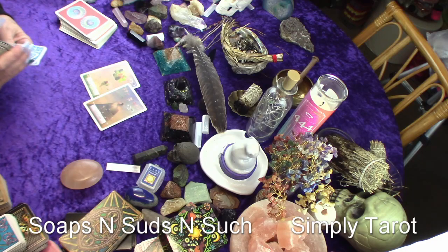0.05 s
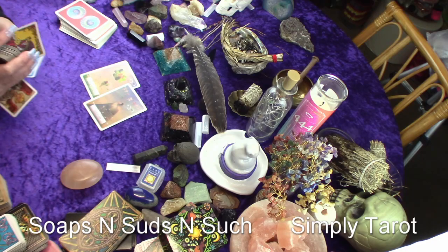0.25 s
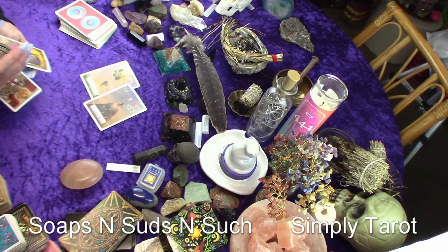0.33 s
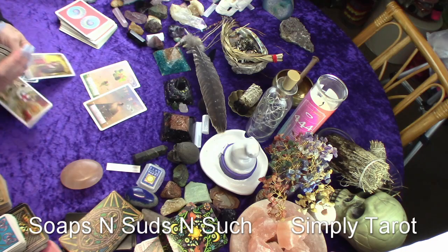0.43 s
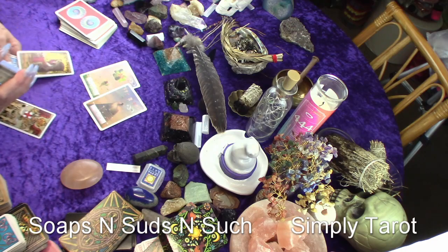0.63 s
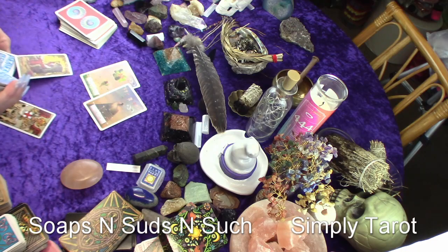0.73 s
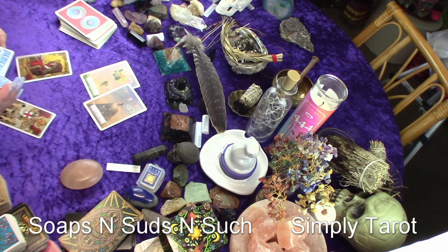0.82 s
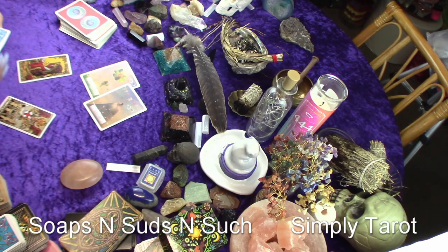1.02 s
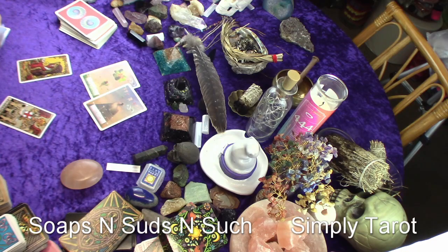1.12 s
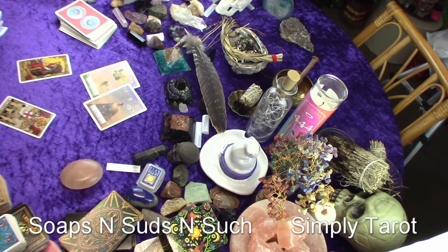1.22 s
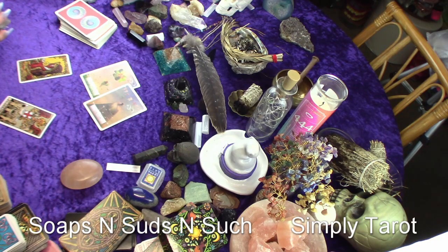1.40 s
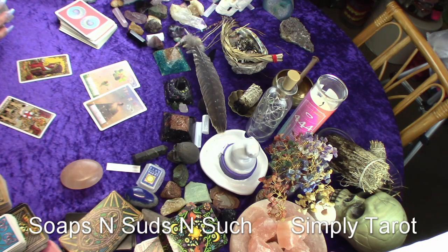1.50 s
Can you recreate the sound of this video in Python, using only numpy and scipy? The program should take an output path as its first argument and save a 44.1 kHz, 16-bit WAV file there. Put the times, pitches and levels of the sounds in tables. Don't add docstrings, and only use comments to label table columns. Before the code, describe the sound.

Crisp card snaps and one hard slap onto a cloth-covered table, then faint card rubbing indoors

```python
import sys
import numpy as np
from scipy import signal
from scipy.fft import rfft, irfft
from scipy.io import wavfile
from scipy.ndimage import uniform_filter1d

SR = 44100
rng = np.random.default_rng(int(sys.argv[2]) if len(sys.argv) > 2 else 0)


def put_to_file(sound):
    columns = np.atleast_2d(sound).T
    safe = np.clip(columns, -1, 1)
    whole_steps = np.round(safe * 32767)
    wavfile.write(sys.argv[1], SR, whole_steps.astype(np.int16))


def boost_factor(decibels):
    exponent = np.asarray(decibels, float) / 20
    return 10 ** exponent


N = 68355


def band(x, hz, width_hz):
    return signal.lfilter(*signal.iirpeak(min(hz, 0.45 * SR), hz / width_hz, fs=SR), x)


def unit(x):
    return x / np.sqrt(np.mean(x ** 2))


def walk(rate_hz):
    hold = int(SR / rate_hz)
    steps = np.repeat(rng.standard_normal(N // hold + 1), hold)
    smooth = uniform_filter1d(uniform_filter1d(steps, hold), hold)
    return unit(smooth[:N])


def hiss():
    # f/Hz, density level/dB
    spectrum = [(25, -42), (100, -11.5), (350, -3.5), (820, -7), (2500, -22.5), (9000, -31), (12500, -44),
                (15500, -58)]
    hiss_db, flicker_db = -59, 0.34
    hz, db = np.array(spectrum).T
    bin_hz = np.arange(N // 2 + 1) * SR / N
    colour = boost_factor(np.interp(np.log(bin_hz + 1), np.log(hz), db))
    noise = irfft(rfft(rng.standard_normal(N)) * colour, N)
    return unit(noise) * boost_factor(hiss_db + flicker_db * walk(33))


def thumps():
    # t/s, level/dB
    landings = [
        (0.328, -60),
        (0.518, -57.5),
        (0.749, -53),
        (.95, -60),
        (1.289, -65.5),
    ]
    hz, width_hz = 104, 47
    push = np.zeros(N)
    for start_s, db in landings:
        push[int(start_s * SR)] += boost_factor(db) * SR / width_hz / np.pi
    return band(band(push, hz, width_hz), hz, 2 * width_hz)


def room(x):
    # delay/ms, level/dB
    echo_table = [
        (2.42, -2.5),
        (4.9, -18),
        (10.3, -16),
        (12.8, -15),
    ]
    # f/Hz, level/dB, T60/s
    tail = [(328, -31, 0.13), (600, -32, .15), (1200, -30.5, 0.12), (2400, -29.5, 0.093),
            (4640, -33.5, 0.17), (8260, -28, 0.12), (13000, -33.5, .1)]
    rise_ms, echo_dull_hz = 1.3, 3500
    t = np.arange(SR // 6) / SR
    response = 0
    for hz, db, t60 in tail:
        fade = boost_factor(db - 60 * t / t60) * (1 - np.exp(-t * 1000 / rise_ms))
        diffuse = unit(fade * band(rng.standard_normal(len(t)), hz, 0.79 * hz))
        response = response + diffuse * np.sqrt(np.mean(fade ** 2)) / 2
    echoes = sum(boost_factor(db) * np.sinc((t - ms / 1000) * SR) for ms, db in echo_table)
    response = response + signal.lfilter(*signal.butter(1, echo_dull_hz, fs=SR), echoes)
    response[0] += 1
    return signal.fftconvolve(x, response)


def slide():
    # t/s, level/dB
    strokes = [(0, -53), (0.109, -70), (.14, -56), (.19, -51.5), (.22, -58), (.64, -69), (0.701, -68.5),
               (.75, -60), (0.799, -67), (1.349, -68.5), (1.384, -55), (1.41, -68.5), (1.435, -55),
               (1.451, -54), (1.472, -54), (1.49, -52.5), (1.522, -60.5), (1.55, -69)]
    # f/Hz, bandwidth/Hz, level/dB
    rub = [(900, 1300, 2.5), (2940, 6300, 2.5), (6300, 9500, -5), (9900, 5000, -17.5)]
    grain_db, flicker_db = 0.5, 1.5
    grain = rng.standard_normal(N) * boost_factor(grain_db * rng.exponential(size=N))
    rubbed = sum((-1) ** k * boost_factor(db) * band(grain, hz, width_hz)
                 for k, (hz, width_hz, db) in enumerate(rub))
    stroke_db = np.interp(np.arange(N) / SR, *np.array(strokes).T)
    return unit(rubbed) * boost_factor(stroke_db + flicker_db * walk(140))


def burst(db, modes, length_ms):
    size = 2048
    lead_db, scatter_db, rise_share = 9, 1.5, 0.18
    u = np.arange(size) / SR * 1000 / length_ms
    shape = np.exp(-u) * (1 - np.exp(-u / rise_share))
    scatter = boost_factor(scatter_db * rng.exponential(size=size))
    clicks = shape * rng.standard_normal((len(modes), size)) * scatter
    clicks[:, 0] = boost_factor(lead_db) / length_ms
    rung = 0
    for click, (hz, width_hz, mode_db) in zip(clicks, modes):
        steep = band(band(click, hz, width_hz), hz, width_hz)
        rung = rung + boost_factor(mode_db) * unit(steep)
    return rung * np.sqrt(np.mean(shape ** 2)) * boost_factor(db) / 2


def partials(hz, ratios):
    return [(hz * ratio, hz * width, db) for ratio, width, db in ratios]


def place(sounds):
    out = np.zeros(N + SR)
    for start_s, sound in sounds:
        wet, i = room(sound), int(start_s * SR)
        out[i:i + len(wet)] += wet
    return out[:N]


def flaps():
    # t/s, level/dB, f/Hz, length/ms
    flap_table = [(.002, -37, 1060, 5.3), (.085, -30.5, 810, 2.05), (.1, -42, 462, 5.1),
                  (.184, -37.5, 714, 5.5), (.199, -28, 810, 5.9), (.205, -30, 415, 6.9),
                  (.265, -25.5, 720, 2.2), (.281, -21.5, 750, 2), (.294, -22.5, 746, 0.96),
                  (.12, -62, 261, 10), (.2, -35, 213, 11), (.324, -8.5, 1147, 2.7), (.326, -9.5, 900, 3.97),
                  (.325, -15, 374, 2.48), (.331, -12, 1330, 2.3), (.436, -37, 537, 4.3),
                  (.518, -24.5, 830, 1.8), (.545, -21, 1110, 0.73), (.546, -28, 530, 2.03),
                  (.577, -27, 678, 3.4), (.583, -24, 582, 2.2), (.59, -26, 850, 3.3), (.756, -43, 600, 3.6),
                  (1.385, -52, 900, 3), (1.438, -38, 1070, 2.7), (1.488, -37, 1200, 3.5)]
    # ratio to pitch, bandwidth/pitch, level/dB
    face = [(.5, 0.36, -10), (1, 0.4, 1.5), (1.45, 0.53, -3), (2.4, 1.35, -13)]
    return place([(s, burst(db, partials(hz, face), ms)) for s, db, hz, ms in flap_table])


def snaps():
    # t/s, level/dB, f/Hz, tick over crack/dB, length/ms
    snap_table = [(.001, -36.5, 2950, -3.5, 5.4), (.077, -44, 3000, -11, 7.5),
                  (0.086, -26.5, 2400, -10.5, 2.93), (0.17, -42, 3500, -10, 5.5),
                  (0.185, -35, 2940, -17, 3.9), (.198, -13.5, 2570, -17, 1.63), (.208, -29, 2600, -10.5, 7),
                  (.265, -29.5, 2870, -6.5, 0.93), (0.298, -35, 2930, -12, 5.9),
                  (.435, -19, 3090, -14.5, 0.99), (.503, -29.5, 2630, -12, 1), (0.519, -30, 3500, -6, 1.1),
                  (.545, -17.5, 2670, -6, 1.01), (.583, -16, 2700, -10, 0.98),
                  (.755, -29.5, 2400, -14.5, 1.4), (0.837, -53, 3950, -7, 1.2),
                  (1.385, -48, 3970, -13, 3.7), (1.438, -36, 2660, -6.5, 0.95),
                  (1.449, -38.5, 2880, -19, 4), (1.487, -35.5, 2570, -4.5, 2.4), (1.512, -40, 3600, -10, 2)]
    # t/s, level/dB, f/Hz, tick over crack/dB, length/ms
    slap = [
        (0.321, -15.5, 2430, -11, 2.5),
        (.324, -8, 2840, -12.5, 4.25),
        (0.332, -9, 2640, -9.5, 1.13),
        (.340, -13, 2120, -28, 3.9),
        (.344, -12, 1860, -34, 2.5),
        (.351, -13.5, 2140, -8.5, 1.46),
        (.361, -19, 1990, -11.5, 4.1),
        (.399, -27.5, 1700, -13, 4.7),
    ]
    # ratio to pitch, bandwidth/pitch, level/dB
    edge = [(0.658, .3, -7.5), (1.002, 0.38, 2), (1.35, 0.61, -4), (1.9, 0.57, -10)]
    # f/Hz, bandwidth/Hz, level/dB
    varnish = [(5190, 4460, 7.5), (8140, 3400, -6), (11700, 4600, -16.5)]
    sounds = []
    for start_s, db, hz, tick_db, length_ms in snap_table + slap:
        crack = burst(db, partials(hz, edge), length_ms)
        tick = burst(db + tick_db, varnish, length_ms)
        sounds.append((start_s, crack + tick))
    return place(sounds)


def scene():
    still = hiss() + thumps()
    moving = room(slide())[:N] + flaps() + snaps()
    low_cut = signal.butter(2, 188, "high", fs=SR, output="sos")
    return (signal.sosfilt(low_cut, moving) + still)[None]


def roll_off(x):
    return signal.sosfilt(signal.butter(12, 16450, fs=SR, output="sos"), x)


def record(dry):
    top_cut = signal.ellip(6, 0.3, 28, 15700, fs=SR, output="sos")
    mix = signal.sosfilt(top_cut, dry)
    return roll_off(mix)


dry = scene()
out = record(dry)
put_to_file(out)
```